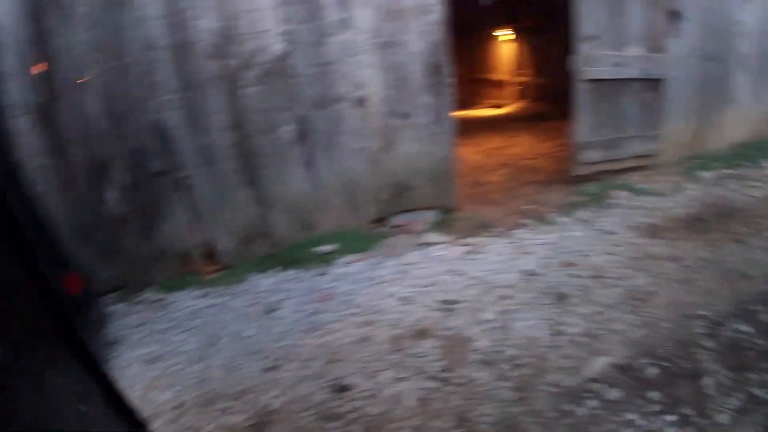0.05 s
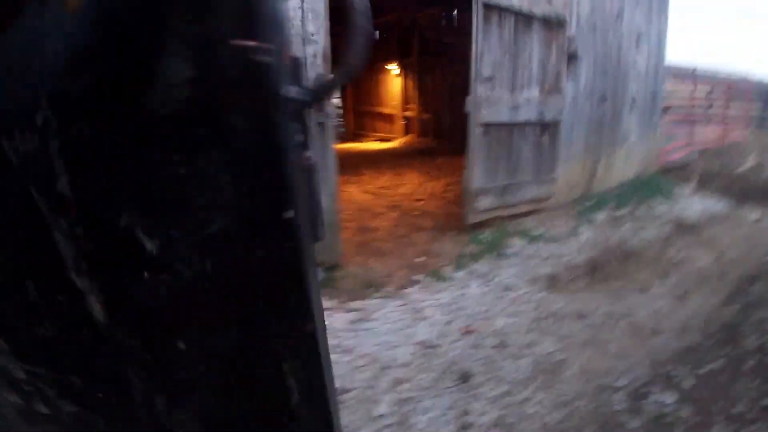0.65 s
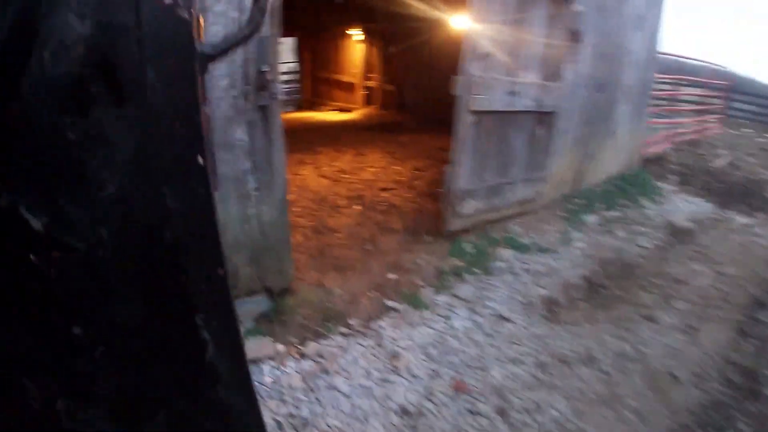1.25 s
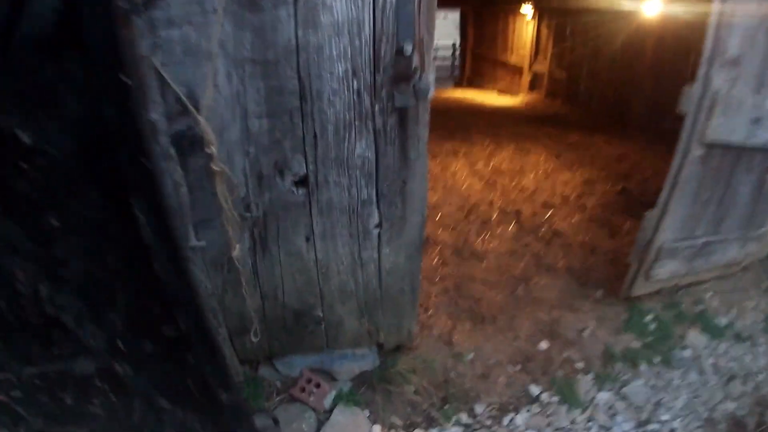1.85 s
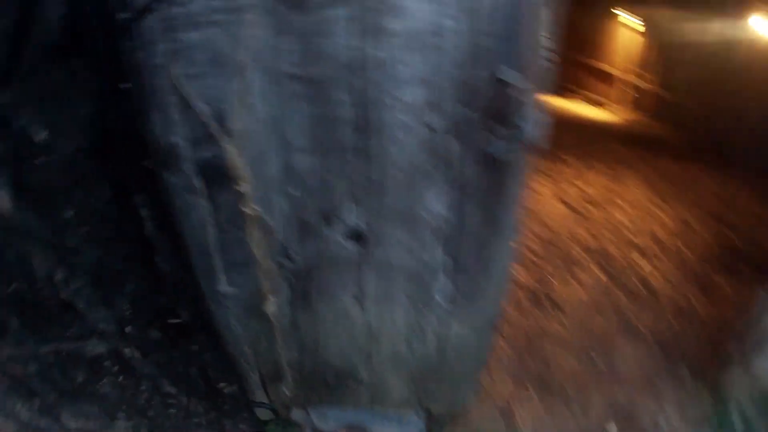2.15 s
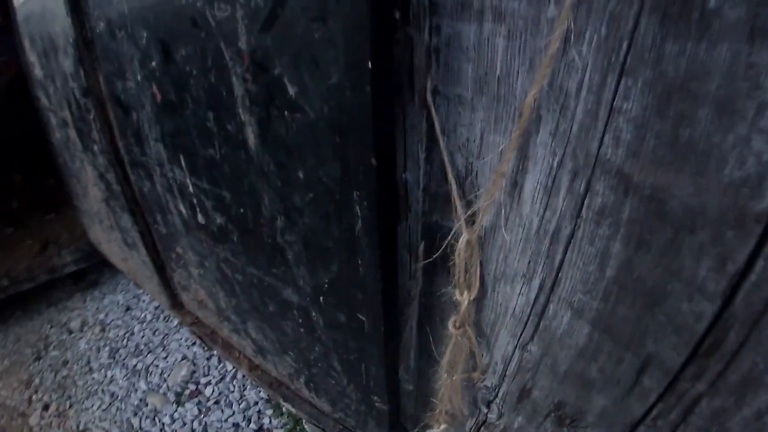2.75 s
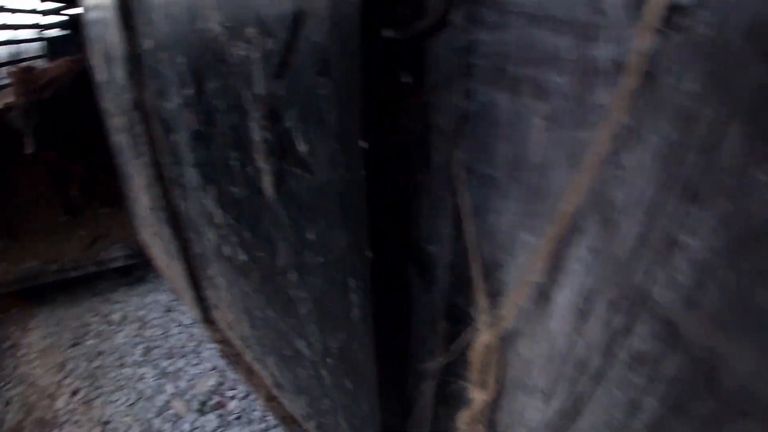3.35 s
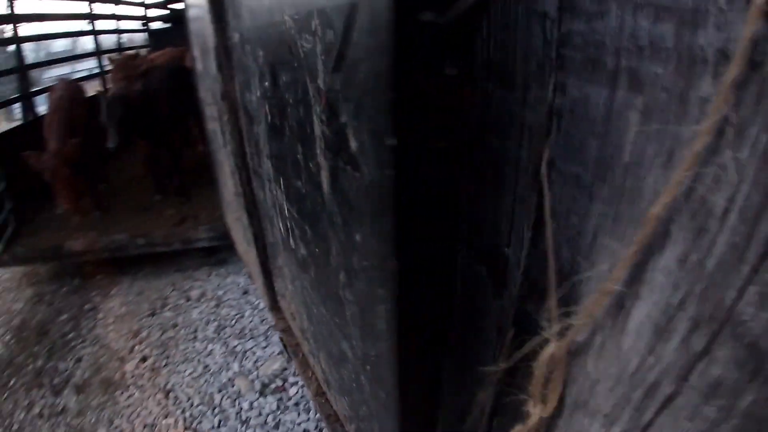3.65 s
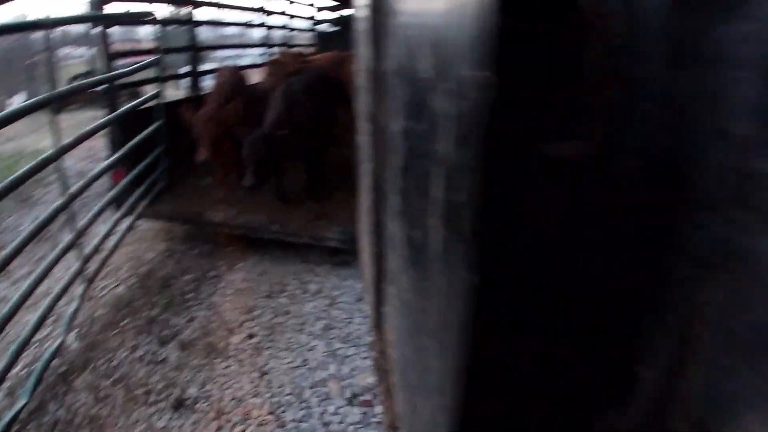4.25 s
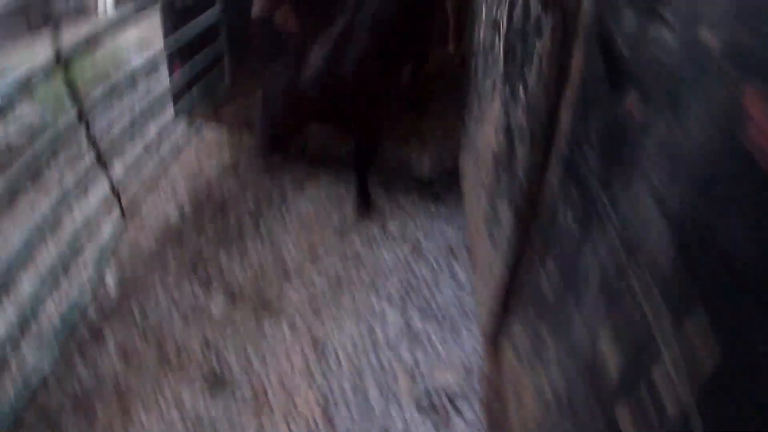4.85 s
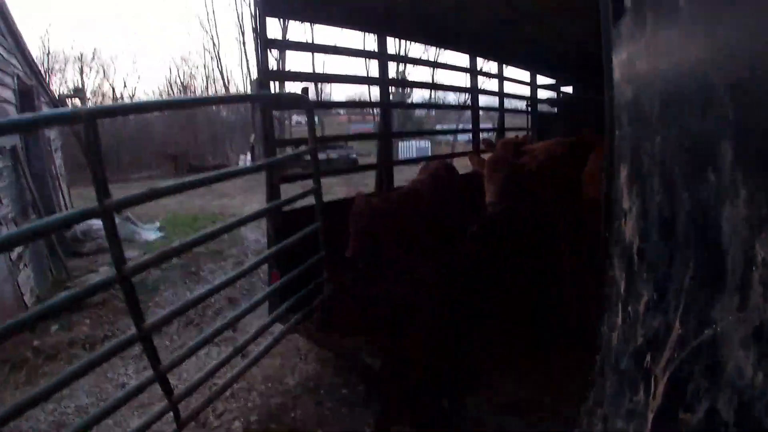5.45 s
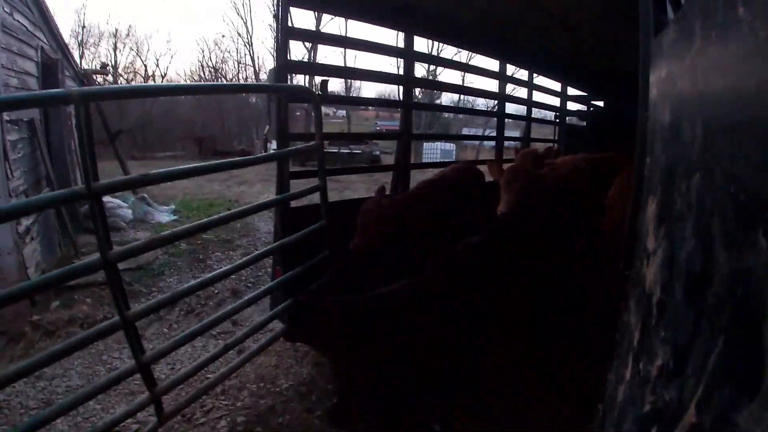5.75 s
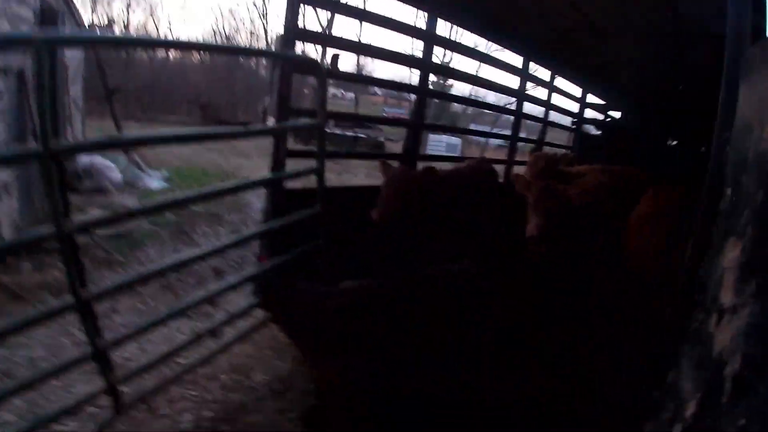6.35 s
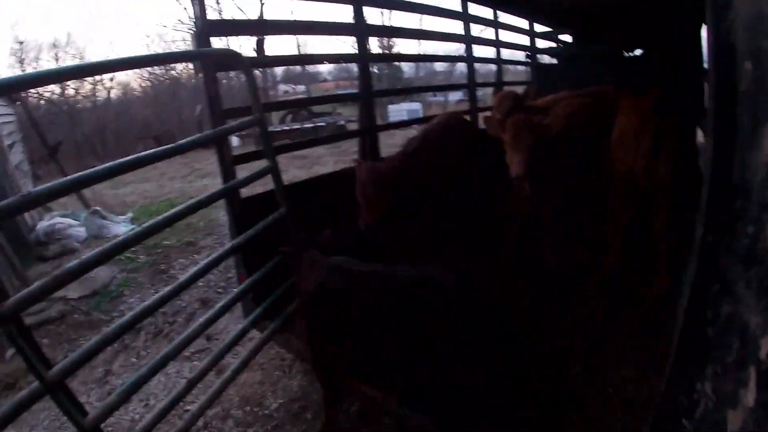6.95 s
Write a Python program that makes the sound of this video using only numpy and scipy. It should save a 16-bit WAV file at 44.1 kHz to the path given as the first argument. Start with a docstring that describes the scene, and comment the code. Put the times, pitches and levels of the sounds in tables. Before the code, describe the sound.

In an open farmyard, a metal latch clacks sharply a few times. A livestock trailer's steel gate then sticks and slips in a loud, slowing run of booming jolts, grinding over grit, and bangs against its stop. Afterwards cattle thump softly on the floor, gravel ticks, a coat rustles and dry hinges squeak briefly. Light wind rumbles on the microphone over a faint outdoor hiss.

```python
"""By a barn, at a steel livestock trailer, one microphone in the open yard. A latch clacks, then the gate
sticks and slips open in a slowing run of jolts that boom in the trailer, grinding over grit, and bangs
against its stop. Dry hinges squeak, cattle shift their hooves and flex the floor, a coat rustles and
gravel ticks underfoot. A light wind rumbles right on the microphone, over the yard's faint hiss."""
import sys
import numpy as np
from scipy import signal
from scipy.fft import rfft, irfft, next_fast_len
from scipy.io import wavfile
from scipy.ndimage import uniform_filter1d, map_coordinates

SR = 44100
rng = np.random.default_rng(int(sys.argv[2]) if len(sys.argv) > 2 else 0)


def unload_wav(signal):
    """Save mono or channel-first audio to the path in sys.argv[1] as 16-bit WAV at rate SR, clipped to [-1, 1]."""
    wavfile.write(
        sys.argv[1],
        SR,
        np.round(np.clip(np.atleast_2d(signal).T, -1, 1) * 32767).astype(np.int16),
    )


N = 313110

# Wind on the microphone, and the yard's hiss. Each row: time in seconds, level in dB.
WIND_LEVELS = [(0.0, -21), (0.22, -40.5), (0.34, -22.5), (1.1, -38), (3.38, -37), (3.48, -49), (3.62, -28),
               (3.68, -47), (3.8, -29.5), (4.03, -46), (4.11, -32), (4.75, -32), (4.77, -28.5), (6.29, -30),
               (6.7, -24), (6.84, -37), (6.94, -15), (7.1, -30)]
YARD_LEVELS = [(0, -45), (.62, -63), (.9, -49.5), (1.35, -61), (3.1, -57.5), (3.33, -59.5), (3.8, -53),
               (4.25, -55.5), (5.8, -47), (7.1, -54.5)]
# Spectra of the wind's buffet and flutter, and of the hiss. Each row: frequency in Hz, level in dB.
BUFFET_SPECTRUM = [(8.8, -14), (15, 4), (27, 2.5), (40, 1.5), (51, -8.5), (76, -19), (120, -31),
                   (160, -38.5), (260, -120)]
FLUTTER_SPECTRUM = [(40, -19), (80, -6.5), (170, 2), (260, -12.5), (400, -27), (900, -63)]
YARD_SPECTRUM = [(100, -18), (250, -9), (600, -5), (1100, -7), (1600, -4), (2600, -8), (4000, -8.5),
                 (4900, -2.5), (6500, -8), (8200, -20.5), (9900, -19), (11300, -34.5), (15000, -63),
                 (16500, -99)]
# Coat rustles and ground scuffs. Each row: middle and length in seconds, level in dB, centre in Hz.
RUBS = [(.17, 0.29, -55.5, 3600), (4.565, 0.25, -43, 1170), (4.719, 0.27, -42, 1410),
        (4.976, 0.087, -42.5, 2220), (5.25, 0.091, -40, 1080), (5.937, 0.12, -39.5, 3800),
        (5.997, .34, -43, 1200), (6.45, 0.22, -43, 1160), (6.865, .08, -48.5, 4600)]
# The clearest ticks of gravel and fittings. Each row: start in seconds, level in dB, centre in Hz.
CLEAR_TICKS = [(.295, -29.5, 5260), (.441, -31.5, 4460), (1.256, -30.5, 4070), (1.410, -32, 4500),
               (2.943, -32, 4500), (3.029, -33, 4940), (3.957, -31, 3740), (4.507, -25.5, 1500),
               (4.659, -27, 4800), (4.772, -22, 6300), (4.816, -20.5, 4300), (5, -22.5, 4000),
               (5.731, -24.5, 3080), (6.974, -30, 5330), (7.033, -29, 3850)]
# Single blows of latch and gate. Each row: start in seconds, level, body and brightness in dB,
# rattle length in seconds, trailer echo in dB.
BLOWS = [(0.315, -21.5, -4.5, -12, 0.02, -15), (0.723, -6.5, -3.5, 5, 0.0093, -24),
         (0.915, 0.5, 3, 11, 0.0077, -24.5), (1.101, -19, 4, 6.5, 0.0068, -32),
         (3.366, -5, 2, 0, 0.011, -5.5), (3.446, -20.5, -2.5, -5.5, 0.048, 0),
         (3.49, -15, -6.5, -7, 0.054, -3.5), (5.198, -20.5, -0.5, -8, 0.057, -35),
         (5.376, -13.5, 3, -3, 0.0055, -39)]
# Broad spectra of latch, gate panel and grit. Each row: frequency in Hz, level in dB.
LATCH_SPECTRUM = [(80, -27.5), (300, -15.5), (900, -13.5), (2000, -11), (3500, -4.5), (5000, 0.5),
                  (6400, -1), (7900, -10.5), (9900, -13), (11000, -31.5), (15000, -37), (16500, -55)]
GATE_SPECTRUM = [(60, -42), (140, -25.5), (280, -6.5), (400, -6), (900, -0.5), (1400, -3.5), (2400, 0),
                 (4000, -2), (6300, -3), (7800, -9.5), (9800, -18.5), (11300, -40), (15000, -39),
                 (16500, -89)]
GRIT_SPECTRUM = [(200, -8.5), (1200, 5.5), (3000, 1.5), (6500, 1.5), (8000, -8.5), (10000, -10),
                 (11500, -29), (15000, -31), (16500, -66)]
# How long latch, panel and trailer ring. Each row: frequency in Hz, seconds to fall 60 dB.
LATCH_T60 = [(300, 0.17), (2000, 0.25), (6000, 0.095), (12000, 0.11)]
PANEL_T60 = [(200, 0.21), (700, 0.19), (2000, 0.16), (6000, 0.14), (12000, 0.12)]
TRAILER_T60 = [(150, 1.86), (600, 1.2), (2000, 1.01), (5000, 0.47), (10000, 0.12)]
# Resonances of the steelwork, the trailer's bars and the housing around the microphone.
# Each row: centre in Hz, width in Hz, gain in dB.
STEEL_RESONANCES = [(182, 73, 11.5), (221, 56, 4), (268, 51, 4.5), (478, 4.8, 6), (618, 7.2, 8.5),
                    (680.6, 18, 12), (1032, 22, 6.5), (1320, 110, 4.5), (1383, 48, -0.5), (1846, 82, 10.5),
                    (2194, 54, 3.5), (3148, 71, 4.5), (3716, 120, 8), (5210, 160, 7.5), (6210, 390, 5.5)]
BAR_RESONANCES = [(1880, 170, 2), (2173, 61, 5), (3360, 220, 3.5)]
HOUSING_RESONANCES = [(1461, 185, 10), (2058, 346, 11), (2802, 96, 10), (3263, 423, 6), (4710, 440, 6),
                      (6020, 550, 4.5), (7320, 110, 7), (9257, 610, 7)]
# The gate's clear modes. Each row: frequency in Hz, level in dB, seconds to fall 60 dB.
GATE_MODES = [(190.4, 0.5, 0.45), (491.4, -3, 0.89), (602, -6.5, 0.74), (660, -11, 0.98), (1305, 14, 0.072),
              (1423, 4.5, 0.1), (1420, 4, 0.083), (1855, -4, 0.4), (2136, 1, 0.28), (2210, -10.5, 0.55),
              (2830, 0.5, 0.2), (3140, -0.5, 0.33), (3350, -8, 0.59)]
# Knocks of hooves and feet. Each row: start in seconds, level in dB, seconds to fall 60 dB.
HOOF_KNOCKS = [(.472, -34.5, 0.12), (1.058, -34, 0.074), (4.398, -30, 0.032), (4.995, -34.5, 0.043),
               (5.238, -26.5, 0.13), (6.876, -33, 0.029)]
# Cattle on the trailer floor. Each row: start in seconds, level in dB, middle of the pitch fall in Hz.
FLOOR_THUMPS = [(.507, -34, 143), (1.984, -32, 129), (2.661, -25.5, 119.7), (3.584, -20, 137),
                (3.879, -32, 94), (4.353, -30, 141), (6.284, -40, 166), (6.753, -35, 160)]
# Hinge squeaks. Each row: middle and length in seconds, pitch and glide in Hz, level and overtone in dB.
HINGE_SQUEAKS = [(0.902, 0.031, 1830, -100, -38.5, -17), (4.508, 0.013, 1794, 20.5, -23.5, -33),
                 (5.281, 0.07, 2033, 57, -37, 1.5), (5.550, 0.11, 1850, -260, -46.5, -5),
                 (5.573, 0.066, 2875, -5, -52, -20), (5.639, 0.071, 1054, -200, -52, -23),
                 (5.686, 0.012, 1910, -10, -38, -8), (5.733, 0.013, 1915, 0, -37.5, -22),
                 (5.731, 0.01, 2660, 0, -33, -11)]
# The gate's edge grinding along. Each row: time in seconds, level in dB.
SCRAPE_LEVELS = [(1.5, -57), (1.56, -38.5), (1.72, -27), (2.46, -36), (2.51, -56), (2.63, -27),
                 (2.72, -35.5), (2.95, -72)]
# Jolts of the juddering gate. Each row: start in seconds, level in dB.
GATE_JOLTS = [(1.547, -5), (1.582, -4.5), (1.623, -4), (1.681, -2.5), (1.726, -4.5), (1.782, -5.5),
              (1.852, -5), (1.914, -5.5), (1.982, -6), (2.044, -8), (2.108, -9), (2.172, -7.5), (2.261, -8),
              (2.327, -8.5), (2.422, -9), (2.524, -11.5), (2.61, -13.5), (2.694, -10.5)]


def amp(db):
    """Decibels to gain."""
    return 10 ** (np.asarray(db) / 20)


def unit(x):
    """x at rms 1."""
    return x / np.sqrt(np.mean(x ** 2) + 1e-20)


def along(points, hz):
    """(Hz, value) points read on a log axis."""
    knots_hz, values = np.transpose(points)
    return np.interp(np.log(hz + 1), np.log(knots_hz + 1), values)


def curve(points):
    """(seconds, value) points read at every sample."""
    return np.interp(np.arange(N) / SR, *np.transpose(points))


def wobble(rate):
    """A smooth random curve, rate knots a second."""
    knots = rng.standard_normal(int(N * rate / SR) + 4)
    return map_coordinates(knots, [np.arange(N) * rate / SR])


def onset(rise_s):
    """One second of gain climbing from 0 towards 1."""
    return 1 - np.exp(-np.arange(SR) / SR / rise_s)


def add(track, start, sound):
    """Mix a sound into the track, start seconds in."""
    part = track[max(round(start * SR), 0):][:len(sound)]
    part += sound[:len(part)]


def at_peak(x, db):
    """Scale a hit so that its loudest 6 ms have crests near db."""
    power = uniform_filter1d(x ** 2, size=265).max()
    return x * amp(db) / (3 * np.sqrt(power))


def bumps(resonances, hz):
    """The dB that a set of resonances adds at each frequency."""
    return sum(db / (1 + (2 * (hz - centre) / width) ** 2) for centre, width, db in resonances)


def hump(hz, centre, octaves, top_hz):
    """The dB response of a broad hump, cut off steeply above top_hz."""
    offset = np.log2((hz + 1) / centre) / octaves
    return -20 * np.log10((1 + offset ** 2) * (1 + (hz / top_hz) ** 12))


def coloured(x, db_of_hz):
    """x through a causal (minimum-phase) filter with the given dB response."""
    size = 2 * next_fast_len(len(x) // 2 + 4096)
    gain = np.maximum(amp(db_of_hz(np.fft.rfftfreq(size, 1 / SR))), 1e-6)
    cepstrum = irfft(np.log(gain))
    cepstrum[1:size // 2] *= 2
    cepstrum[size // 2 + 1:] = 0
    return irfft(rfft(x, size) * np.exp(rfft(cepstrum)), size)[:len(x)]


def shaped(x, spectrum):
    """x filtered by a spectrum of (Hz, dB) points."""
    return coloured(x, lambda hz: along(spectrum, hz))


def noise(spectrum):
    """Steady noise of rms 1."""
    return unit(shaped(rng.standard_normal(N), spectrum))


def wind(buffet_db=1.0, flutter_db=-47.5, flutter_growth=0.57):
    """Slow eddies right on the microphone, with a lumpy flutter above them; one strength drives both."""
    strength_db = curve(WIND_LEVELS) + wobble(11)
    lumps = amp(3.2 * wobble(25))
    flutter_gain = amp(flutter_db + flutter_growth * (strength_db - strength_db.mean()))
    flutter = flutter_gain * unit(lumps * noise(FLUTTER_SPECTRUM))
    return amp(strength_db + buffet_db) * noise(BUFFET_SPECTRUM) + flutter


def yard(grain_db=2.0):
    """The faint, slightly restless and grainy hiss of the open yard."""
    grain = unit(amp(grain_db * wobble(300)))
    level_db = curve(YARD_LEVELS) + wobble(4.86) + wobble(35)
    return amp(level_db) * grain * noise(YARD_SPECTRUM)


def rustles(grain_db=2.5):
    """A coat rubs and feet scuff; each rub swells and fades, grainy with many tiny slips."""
    out = np.zeros(N)
    slips = amp(grain_db * wobble(500) + 3.0 * wobble(40))
    for middle, length, db, centre in RUBS:
        rub = coloured(rng.standard_normal(SR), lambda hz: hump(hz, centre, octaves=0.94, top_hz=8500))
        swell = np.sin(np.linspace(0, np.pi, int(length * SR)))
        add(out, middle - length / 2, amp(db) * swell * unit(rub)[:len(swell)])
    return out * unit(slips)


def tap(db, centre, t60, octaves, top_hz, rise_s):
    """A small contact: a short grainy burst around a centre frequency, with no ring."""
    t = np.arange(SR // 3) / SR
    grains = rng.standard_normal(len(t)) * amp(5 * rng.standard_normal(len(t)))
    burst = grains * amp(-60 * t / t60) * (1 - np.exp(-t / rise_s))
    return at_peak(coloured(burst, lambda hz: hump(hz, centre, octaves, top_hz)), db)


def gravel(faint_per_s=7.3, faint_db=-38, spread_db=4.5, faint_hz=4350):
    """Stones underfoot and fittings tick: a few clearly, many faintly and at random."""
    out, count = np.zeros(N), int(faint_per_s * N / SR)
    faint = [(when * N / SR, faint_db + spread_db * (2 * force - 1), faint_hz * 2 ** (pitch - 0.5))
             for when, force, pitch in rng.random((count, 3))]
    for start, db, centre in CLEAR_TICKS + faint:
        add(out, start, tap(db, centre, t60=0.054, octaves=0.77, top_hz=8630, rise_s=0.00022))
    return out


def dense_ring(ring_times, size=SR):
    """Countless modes struck at once, each frequency dying at its own speed; energy 1."""
    hz, t, spectra = signal.stft(rng.standard_normal(size), SR, nperseg=256)
    decay = amp(-60 * t / along(ring_times, hz)[:, None])
    ring = signal.istft(spectra * decay, SR, nperseg=256)[1][:size]
    return ring / np.linalg.norm(ring)


def trailer_echo(x, delay_s=0.012):
    """The steel box answers with a long diffuse tail, reaching the microphone just after the sound."""
    delayed = np.pad(x, (int(delay_s * SR), 0))
    return signal.fftconvolve(delayed, dense_ring(TRAILER_T60))[:N]


def boom(tilt):
    """The steel box's tail, swelling after a blow; tilt is (Hz, dB) points."""
    return shaped(dense_ring(TRAILER_T60) * onset(0.014), tilt)


def struck(ring_times, length, rebound_db, rise_s, rebounds=4):
    """A blow and its fading rebounds within length seconds, each at a new spot on the steel; energy 1."""
    hit = dense_ring(ring_times)
    for progress in (np.arange(rebounds) + rng.random(rebounds)) / rebounds:
        rebound = amp(rebound_db - 4.9 * progress) * dense_ring(ring_times, size=SR // 4)
        add(hit, progress * length, rebound)
    hit *= onset(rise_s)  # waves take a moment to spread through the metal
    return hit / np.linalg.norm(hit)


def snap(t60=0.029):
    """The instant of contact, gone in a few milliseconds; energy 1."""
    burst = dense_ring([(0, t60)]) * onset(0.0016)
    return burst / np.linalg.norm(burst)


def steel_colour(hz, spectrum, body_db, bright_db):
    """The steel's dB response; heavy contacts bring out the body, hard ones the treble."""
    treble_db = bright_db * along([(2500, 0.016), (6100, 1), (8500, 0.26)], hz)
    return along(spectrum, hz) + bumps(STEEL_RESONANCES, hz) + body_db + treble_db


def gate_ring(scatter_db=3):
    """The gate's modes ring on, at new strengths for every blow."""
    hz, db, t60 = np.transpose(GATE_MODES)[:, :, None]
    t = np.arange(SR) / SR
    strength, phase = rng.standard_normal((2, len(hz), 1))
    partials = amp(db + scatter_db * strength - 60 * t / t60) * np.sin(2 * np.pi * (hz * t + phase))
    return partials.sum(0) * onset(0.00083)


def clanks(level_db=-1, ring_db=-16):
    """The latch snaps brightly; the gate meeting its stop rings on and shakes the whole trailer."""
    out = np.zeros(N)
    for start, db, body_db, bright_db, length, echo_db in BLOWS:
        crack_db = 6 + 0.64 * db  # harder clanks crack more in the top treble
        snap_db = -8.5 + 0.74 * bright_db  # brighter ones begin with more snap
        tail = coloured(boom([(2000, 4), (6000, -2.0)]), lambda hz: bumps(BAR_RESONANCES, hz))
        hit = struck(LATCH_T60, length, rebound_db=-4, rise_s=0.0012)
        hit += amp(echo_db) * tail + amp(snap_db) * snap()
        body = lambda hz: body_db * along([(2100, 0.93), (3600, 0)], hz)
        crack = lambda hz: crack_db * along([(6500, 0.088), (8800, 1.0)], hz)
        hit = coloured(hit, lambda hz: steel_colour(hz, LATCH_SPECTRUM, body(hz), bright_db) + crack(hz))
        # hard contact favours high modes
        ring = shaped(gate_ring(), [(500, -25), (1400, -19.0), (1900, -4)])
        add(out, start, at_peak(hit, db + level_db) + amp(db + echo_db + ring_db) * ring)
    return out


def hooves(centre_hz=590):
    """Hooves and feet land with a soft, dull knock."""
    out = np.zeros(N)
    for start, db, t60 in HOOF_KNOCKS:
        add(out, start, tap(db, centre_hz, t60, octaves=0.76, top_hz=3960, rise_s=0.0028))
    return out


def floor_thumps(sag=0.52, t60=0.058, echo_db=-13):
    """The floor flexes under cattle, its pitch sagging as the weight settles; the trailer rumbles on."""
    out, t = np.zeros(N), np.arange(SR // 3) / SR
    swell = amp(-60 * t / t60) * (1 - np.exp(-t / 0.0035)) ** 2
    for start, db, hz in FLOOR_THUMPS:
        pitch = hz * (1 + sag * (2 * np.exp(-t / 0.012) - 1))
        phase = 2 * np.pi * np.cumsum(pitch) / SR
        add(out, start, amp(db) * swell / swell.max() * np.sin(phase))
    return out + amp(echo_db) * trailer_echo(out)


def squeaks(waver=0.035, echo_db=-21):
    """A dry hinge sings briefly on an unsteady pitch."""
    out, unsteady = np.zeros(N), wobble(600)
    for middle, length, hz, glide_hz, db, overtone_db in HINGE_SQUEAKS:
        position = np.linspace(-0.5, 0.5, int(length * SR))
        drift = waver * unsteady[int(middle * SR):][:len(position)]
        pitch = (hz + glide_hz * position) * (1 + drift)
        phase = 2 * np.pi * np.cumsum(pitch) / SR
        tone = sum(amp(overtone_db * np.sqrt(k)) * np.sin((k + 1) * phase) for k in range(3))
        add(out, middle - length / 2, amp(db) * unit(tone) * np.cos(np.pi * position) ** 2)
    return out + amp(echo_db) * trailer_echo(out)


def scrape(grit_db=3.5):
    """Rust and grit crunch under the gate's edge while it moves."""
    grains = rng.standard_normal(N) * amp(grit_db * wobble(900) + wobble(58))
    return amp(curve(SCRAPE_LEVELS)) * unit(shaped(grains, GRIT_SPECTRUM))


def judder(level_db=-1, echo_db=-12, ring_db=-33, spread_s=0.13, boom_db_per_s=6, dulling_db_per_s=8):
    """The gate sticks and slips; each jolt rattles its panel and sets the trailer booming."""
    out = np.zeros(N)
    for start, db in GATE_JOLTS:
        age = start - GATE_JOLTS[0][0]
        # a short, thin clang at first; as the shaking spreads into the trailer, jolts rattle and boom
        spread = 1 - np.exp(-age / spread_s)
        rattle_s = 0.005 + 0.025 * spread
        clang_db = 10.5 - 7 * spread
        # as the gate slows, its jolts grow heavier and duller
        boom_db = -22.5 + 22 * spread + boom_db_per_s * age
        bright_db = 6.5 - dulling_db_per_s * age
        hit = struck(PANEL_T60, rattle_s, rebound_db=-8, rise_s=0.0013)
        hit += amp(echo_db) * boom([(250, 11.5), (1200, -1.5), (6000, 6.5)])
        weight = lambda hz: boom_db * along([(600, 0.6), (1300, 0.37)], hz)
        body = lambda hz: weight(hz) + bumps([(1370, 440, clang_db)], hz)
        hit = coloured(hit, lambda hz: steel_colour(hz, GATE_SPECTRUM, body(hz), bright_db))
        ring = coloured(gate_ring(), body)
        add(out, start, at_peak(hit, db + level_db) + amp(db + ring_db) * ring)
    return out


def scene():
    """Beside the trailer, in mono: steelwork, ticks and knocks with their echo, and the outdoor air."""
    underfoot = gravel() + hooves()
    steel = judder() + scrape() + clanks() + squeaks()
    echo = amp(-17) * trailer_echo(underfoot)
    return (steel + underfoot + echo + rustles() + floor_thumps() + wind() + yard())[None]


def record(dry, top_hz=15600):
    """A camera's microphone: its housing colours the sound, and nothing above top_hz is kept."""
    housing = lambda hz: bumps(HOUSING_RESONANCES, hz) + along([(500, 1.5), (1500, -4.0)], hz)
    housed = coloured(dry[0], housing)
    in_band = np.fft.rfftfreq(N, 1 / SR) < top_hz
    return irfft(rfft(housed) * in_band, N)[None]


dry = scene()
out = record(dry)
unload_wav(out)
```